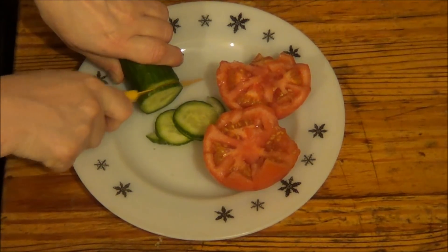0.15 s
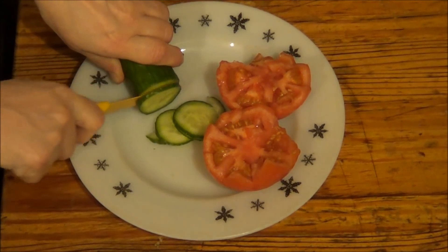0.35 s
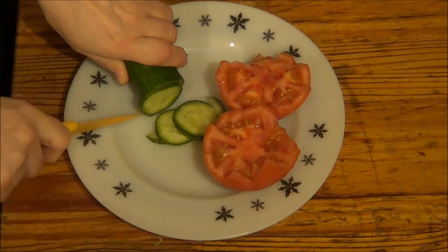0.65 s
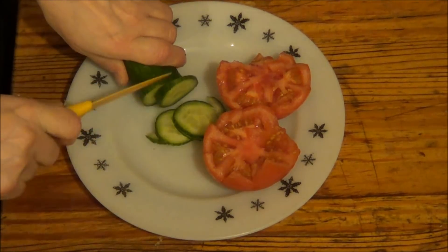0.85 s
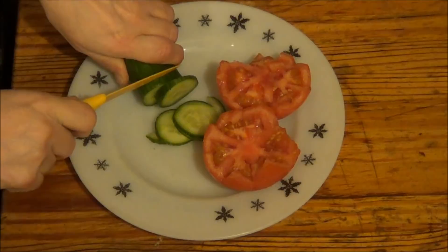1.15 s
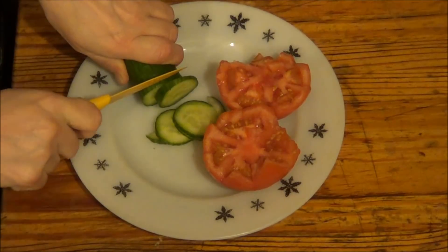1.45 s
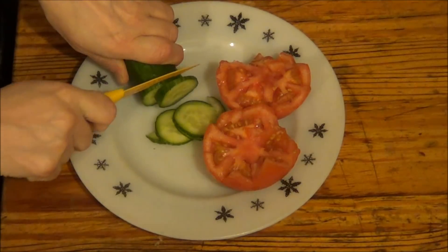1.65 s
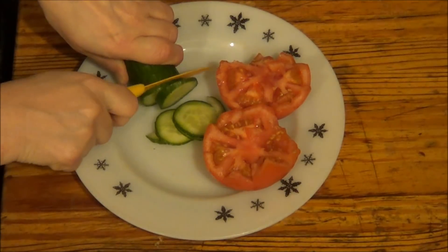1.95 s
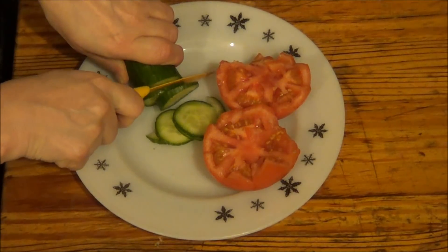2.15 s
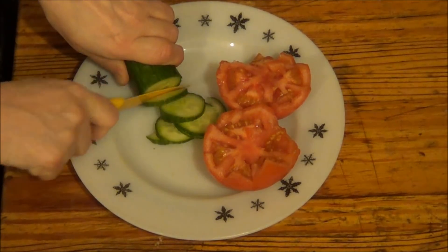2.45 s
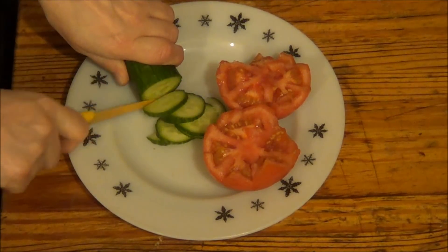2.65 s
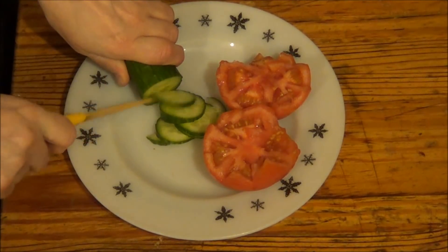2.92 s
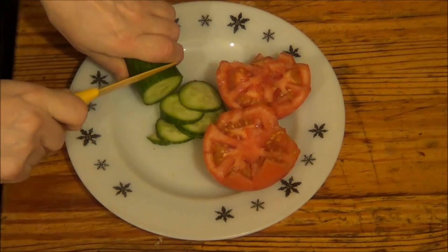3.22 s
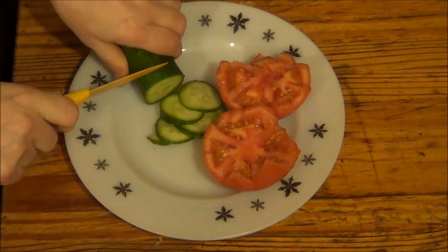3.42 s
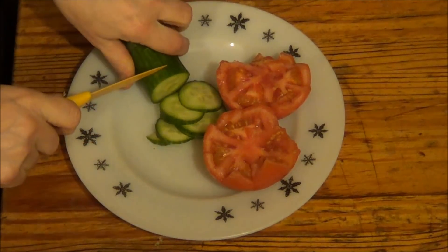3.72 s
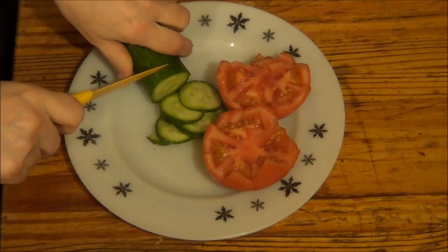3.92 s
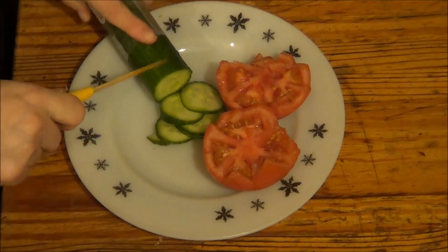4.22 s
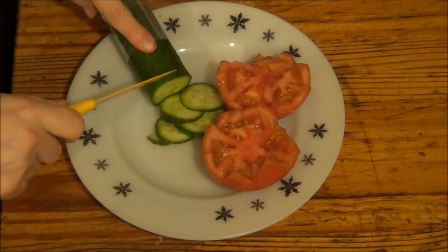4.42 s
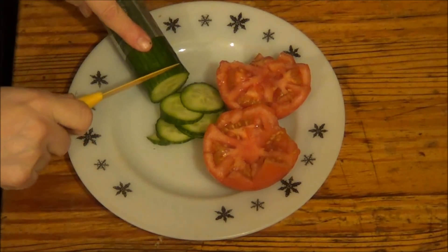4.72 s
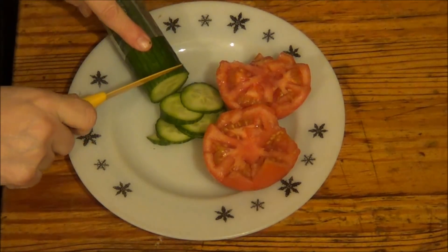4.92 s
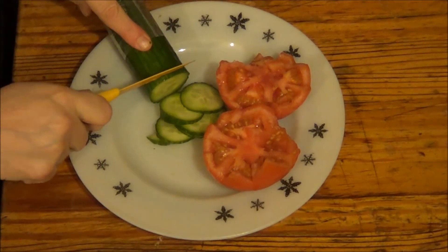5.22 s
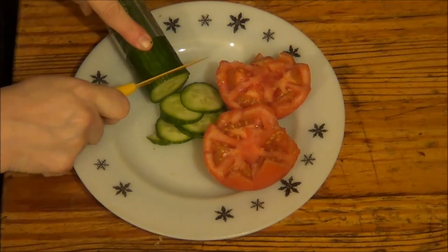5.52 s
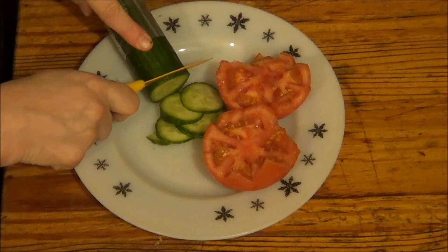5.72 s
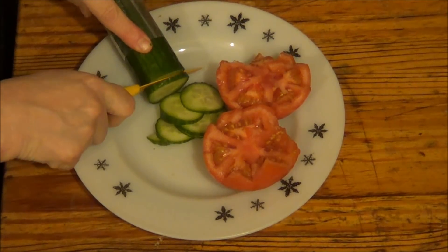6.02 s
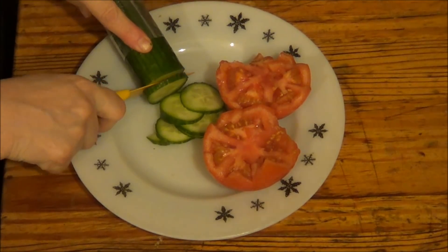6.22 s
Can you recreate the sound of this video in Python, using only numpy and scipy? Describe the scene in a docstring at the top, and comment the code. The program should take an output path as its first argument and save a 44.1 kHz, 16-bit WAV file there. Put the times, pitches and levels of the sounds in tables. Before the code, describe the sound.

Stereo close microphone: crisp, grainy slicing of cucumber, dry knife clicks with short metallic ringing, and gritty ceramic scraping. The busiest burst comes early; later cuts are spaced out, with tiny ticks, a faint squeak, light plate rubs and a dull wooden knock between them. A final crunch and hard strike follow a near lull. The room adds a short dull tail over quiet air and a faint throbbing high whine.

```python
"""A small knife saws through a cucumber, drags over a ceramic plate and ticks against it, heard close up in a kitchen.
Crunch is random snaps coloured to the treble; drags are dense grit driving blade or plate modes.
Ticks are short noise cracks with ringing modes, thuds swelling and dying bands of noise from the wooden table.
A diffuse room tail follows; room air (filtered noise) and a thin throbbing whine lie under it."""
import sys
import numpy as np
from scipy import signal
from scipy.fft import rfft, irfft, next_fast_len
from scipy.io import wavfile

SR = 44100
rng = np.random.default_rng(int(sys.argv[2]) if len(sys.argv) > 2 else 0)


def wrap_up_sound(samples):
    """Save the sound to the file named by the first command line argument, as 16-bit audio."""
    columns = np.atleast_2d(samples).T
    # keep every value between -1 and 1, then stretch to whole-number steps
    tamed = np.clip(columns, -1, 1)
    steps = np.round(tamed * 32767).astype(np.int16)
    wavfile.write(sys.argv[1], SR, steps)


N = 280917


def undb(db):
    """Decibels to amplitude."""
    return 10 ** (np.asarray(db) / 20)


def level(x, db):
    """Scale x to an RMS of db."""
    return x * undb(db) / np.sqrt(np.mean(x ** 2))


def colour(x, table):
    """Filter by (frequency [Hz], gain [dB]) points, joined over log frequency."""
    size = next_fast_len(len(x))
    hz, db = np.transpose(table)
    bin_hz = np.arange(size // 2 + 1) * SR / size
    gain = undb(np.interp(np.log(bin_hz + 1), np.log(hz), db))
    return irfft(rfft(x, size) * gain, size)[:len(x)]


def band(x, lo_hz, hi_hz):
    """Band-pass."""
    return signal.sosfilt(signal.butter(2, [lo_hz, hi_hz], "band", fs=SR, output="sos"), x)


def add(out, at_s, x, peak_db):
    """Lay x into out at at_s with its peak at peak_db."""
    k = int(at_s * SR)
    out[k:k + len(x)] += (x * undb(peak_db) / np.max(np.abs(x)))[:N - k]


def background():
    """Room air, alike in both ears in bass and treble, and a high whine that throbs at 50 Hz."""
    # air common to both ears: (frequency [Hz], density [dB per Hz], relative)
    common_air = [(15, -41), (25, -14), (131, -6), (192, -7), (226, -7.5), (330, -7), (496, -11.5),
                  (553, -10), (1060, -14.5), (2210, -18), (12200, -21.5), (15200, -21.5), (16500, -18)]
    # air of opposite sign left and right: (frequency [Hz], density [dB per Hz], relative)
    wide_air = [(15, -47), (25, -29), (121, -13), (288, -6.5), (584, -6), (831, -6.5), (1010, -8),
                (1150, -8.5), (9330, -23), (16500, -79)]
    # whine level, dips and creeps back up: (time [s], level [dB])
    creep = [(0, -52.5), (.5, -53), (.75, -58.5), (2.23, -54), (2.3, -59), (3.0, -65), (4.2, -59),
             (6.14, -54.5), (6.19, -59.5), (6.37, -54)]
    whine_hz, throb_hz, throb_depth = 15625, 50, 0.55
    s = np.arange(N) / SR
    at, db = np.transpose(creep)
    whine_db = np.interp(s, at, db)
    # air levels where the whine is weakest
    mid = level(colour(rng.standard_normal(N), common_air), -49.5)
    side = level(colour(rng.standard_normal(N), wide_air), -53.5)
    throb = 1 + throb_depth * np.sin(2 * np.pi * throb_hz * s)
    whine = np.sqrt(2) * np.sin(2 * np.pi * whine_hz * s) * throb
    # air follows the whine's level by 0.77 dB per dB
    air_gain = undb(0.77 * (whine_db - whine_db.min()))
    air = (mid + side * np.array([[1], [-1]])) * air_gain
    return air + whine * undb(whine_db)


def ring(modes, damping=0.98):
    """A third of a second of each decaying mode, one row a mode; damping divides the t60."""
    hz, db, t60_s = np.transpose(modes)[:, :, None]
    s = np.arange(SR // 3) / SR
    decay = 1000 ** (-s * damping / np.clip(t60_s, .005, .4))
    return undb(db) * np.sin(2 * np.pi * hz * s) * decay


def blade_modes():
    """Resonances of the hand-held blade as modes: the wider, the shorter."""
    # (frequency [Hz], width [Hz], level [dB] before the width is added)
    resonances = [(900, 480, -1.5), (1985, 11, -2), (2057, 56, 5.5), (2980, 73, -2), (3110, 82, 6.5),
                  (3370, 200, 0), (4440, 27, -5), (4540, 34, 5), (5620, 27, 4), (6100, 40, -6),
                  (6234, 150, 8.5), (8000, 200, -32), (9900, 83, -12), (10280, 61, 4.5), (10500, 120, -26)]
    return [(hz, db + 10 * np.log10(width_hz), np.log(1000) / np.pi / width_hz)
            for hz, width_hz, db in resonances]


def plate_modes():
    """A round plate rings in close pairs: each mode has a weaker, shorter twin."""
    # (frequency [Hz], level [dB], t60 [s] before damping)
    modes = [(560, -17, .2), (630, -19, .2), (1287, -17, .4), (1992, -17, .22), (2078, -16, .26),
             (2720, -15, .08), (2891, -9, .29), (3079, -14, .13), (3250, -15, .1), (3420, -13, .17),
             (3800, -11, .14), (4260, -11, .08), (4380, -9, .09), (4580, -15, .2), (4750, -17, .15),
             (5070, -11, .08), (5308, -5, .09), (5840, -18, .2), (6185, -16, .12), (6444, -8, .11),
             (7040, -18, .13), (7930, -13, .14), (9780, -11, .12), (11785, -14, .13), (13940, -24, .12)]
    return modes + [(hz * 1.02, db - 8, t60_s / 2) for hz, db, t60_s in modes]


def struck(rings, scatter_db):
    """Every spot struck weighs the modes anew."""
    return undb(scatter_db * rng.standard_normal(len(rings))) @ rings


def ticks():
    """A crack under a millisecond and one bounce; the edge chatters on and shakes blade and plate, damped by the hand."""
    # (time [s], sharp crack peak [dB], dull crack peak [dB], blade ring peak [dB], plate ring peak [dB],
    #  share of after-chatter [0-1])
    blows = [(0.0145, -14, -15.5, -14.5, -24, 0.16), (0.2996, -23, -35, -30, -45, 0.3),
             (0.3643, -7.5, -17, -13.5, -45, 0.16), (0.4194, -1.5, -8.5, -8.5, -42, 0.1),
             (0.449, -21, -24, -20, -41, 0.25), (0.497, -12, -22, -26, -45, 0),
             (0.4993, 0.5, -6, -13, -45, 0.17), (0.536, -7, -25, -13, -40, 0.13),
             (0.5463, -8, -13.5, -32, -46, 0.1), (0.559, -11, -22, -36, -35, 0),
             (1.8632, -21, -46, -47, -51, 0.5), (1.9736, -22, -39, -45, -53, 0.27),
             (2.179, -21.5, -45, -47, -53, 0), (2.218, -19, -41, -47, -56, .3),
             (2.2395, -3.5, -6.5, -7.5, -11, 0.26), (2.607, -21, -36, -39, -41, 0.1),
             (2.6594, -27, -30, -47, -45, 0.4), (2.723, -16.5, -27, -30, -38, 0.37),
             (2.7424, -9.5, -23, -25, -39, 0.2), (3.3226, -26, -50, -52, -58, 0.33),
             (3.356, -39, -45, -46, -53, 0.02), (3.3879, -20.5, -21, -34, -46, 0.3),
             (3.4167, -25, -35, -45, -55, 0.24), (3.4544, -28, -46, -50, -50, 0.3),
             (3.4625, -23, -47, -50, -46, 0.15), (3.5605, -24, -50, -53, -59, 0),
             (3.58, -20, -37, -47, -56, 0.1), (3.5914, -24, -45, -54, -57, 0),
             (3.7015, -28, -43.5, -42, -44, 0.3), (3.9923, -27, -43, -43, -46, 0.1),
             (4.2527, -41, -37, -28.5, -46, 0.4), (4.2746, -26, -48, -50, -52, 0.14),
             (4.4863, -26.5, -50, -55, -56, 0.26), (4.495, -31, -50, -55, -56, 0.1),
             (5.7827, -24, -29.5, -41, -53, 0.23), (5.829, -24.5, -40, -50, -55, .1),
             (5.8444, -26, -33, -46, -52, 0), (5.8685, -25, -45, -47, -53, 0),
             (5.9816, -24, -28.5, -38, -44, 0.3), (6.018, -27, -46, -48, -55, 0.4),
             (6.11, -29, -26, -39, -51, 0.2), (6.135, -27, -27, -48, -50, 0),
             (6.1531, -0.5, -10.5, -7, -20, 0.04), (6.1648, -26, -43, -32, -26.5, 0.1)]
    crack_decay_s, chatter_decay_s = 0.00033, 0.0073
    out, s = np.zeros(N), np.arange(SR // 10) / SR
    blade, plate = ring(blade_modes(), damping=1.11), ring(plate_modes(), damping=2.0)
    for at_s, sharp_db, dull_db, blade_db, plate_db, after in blows:
        snap = rng.standard_normal(len(s)) * np.exp(-s / crack_decay_s)
        bounce_s = rng.uniform(0.0021, .003)
        snap = snap + 0.49 * np.roll(snap, int(bounce_s * SR))
        chatter = after * rng.standard_normal(len(s)) * np.exp(-s / chatter_decay_s)
        blow = (s == 0) + 0.34 * chatter
        blade_ring = signal.fftconvolve(blow, struck(blade, 0.79))
        plate_ring = signal.fftconvolve(blow, struck(plate, 2.0))
        add(out, at_s, band(snap + chatter, 7750, 12850), sharp_db)
        add(out, at_s, band(snap + chatter, 4300, 5900), dull_db)
        add(out, at_s, blade_ring, blade_db)
        # a blow through the edge wakes mostly the plate's middle modes
        add(out, at_s, band(plate_ring, 1800, 3700), plate_db)
    return out


def thuds():
    """The table top's modes are too crowded to tell apart: each blow swells for a moment and dies as a rumble."""
    # (time [s], peak [dB], low edge [Hz], high edge [Hz], t60 [s])
    blows = [(0.024, -21.5, 134, 437, 0.26), (0.03, -36, 54.7, 100., 0.17), (0.42, -32, 150., 380, 0.18),
             (0.62, -48, 59.6, 133, 0.075), (0.645, -34.5, 406, 1450, 0.34), (2.045, -30, 110., 263, 0.14),
             (2.244, -25.5, 150., 890, 0.22), (2.259, -42.5, 54.5, 91, 0.19), (2.86, -34, 470, 890, 0.32),
             (3.729, -35.5, 198, 610, 0.6), (4.251, -15, 197, 750, 0.22), (4.255, -26.5, 60., 210, 0.2),
             (6.085, -31, 66, 149, 0.24), (6.154, -27.5, 194, 710, 0.22)]
    out, s = np.zeros(N), np.arange(SR // 3) / SR
    for at_s, peak_db, lo_hz, hi_hz, t60_s in blows:
        swell = (1 - np.exp(-s * lo_hz * 3.0)) * 1000 ** (-s / t60_s)
        rumble = band(rng.standard_normal(len(s)), lo_hz, hi_hz)
        rumble = band(rumble, lo_hz * 0.74, hi_hz * 1.37)
        rumble = band(rumble * swell, lo_hz * 0.79, hi_hz * 1.6)
        add(out, at_s, rumble, peak_db)
    return out


def force(strokes, axis):
    """Gain over time: every stroke swells, holds and dies away; the strongest one rules."""
    swell_db = 20  # change over one rise or fall time
    s, gain_db = np.arange(N) / SR, np.full(N, -120.)
    for row in strokes:
        at_s, rise_s, hold_s, fall_s = row[:4]
        end_s = at_s + hold_s
        k = slice(max(int((at_s - 3 * rise_s) * SR), 0), int((end_s + 3 * fall_s) * SR))
        before = np.maximum(at_s - s[k], 0) / rise_s
        after = np.maximum(s[k] - end_s, 0) / fall_s
        gain_db[k] = np.maximum(gain_db[k], row[axis] - swell_db * (before + after))
    return undb(gain_db)


def grains(rate_hz, spread_db):
    """Random snaps: many small, a few large."""
    hit = rng.random(N) < rate_hz / SR
    return hit * rng.standard_normal(N) * undb(spread_db * rng.exponential(size=N))


def rubbed(modes, gain, grit_db):
    """Dense grit under the edge drives the modes and is heard itself."""
    # direct grit: (frequency [Hz], density [dB per Hz], relative)
    grit_colour = [(180, -56), (300, -68), (689, -6), (2570, -33), (2980, -1), (4020, -2.5), (6410, -3),
                   (14200, -15.5), (16000, -29)]
    grit = level(grains(rate_hz=9000, spread_db=2.5), 0)
    body = ring(modes).sum(axis=0)
    body = body / np.sqrt(np.sum(body ** 2))
    rung = signal.fftconvolve(grit * gain, body)[:N]
    direct = undb(grit_db) * gain * level(colour(grit, grit_colour), 0)
    return rung + direct


def sawing():
    """Cells burst under the edge, while the blade sings where it drags."""
    # knife: (full force [s], rise [s], hold [s], fall [s], flesh crunch [dB], blade on glaze [dB])
    strokes = [(0.19, 0.068, 0.11, .02, -42, -42), (0.355, .08, 0.072, .02, -37, -38),
               (0.45, 0.066, 0.014, 0.065, -32.5, -33.5), (0.512, 0.011, 0.0041, 0.025, -28, -37),
               (0.55, .05, 0.021, .03, -32, -38), (0.63, 0.086, .0, .01, -44, -36.5),
               (0.85, 0.4, 0.36, .9, -47, -73), (1.58, 0.12, 0.0078, .1, -42, -75),
               (1.65, 0.079, .0, .1, -38.5, -66), (1.815, 0.31, 0.047, 0.17, -38.5, -67),
               (2.058, 0.11, .0, 0.058, -28, -60), (2.183, 0.032, 0.058, .01, -41.5, -70),
               (2.217, 0.0046, 0.039, .01, -33.5, -60), (2.245, 0.0053, 0.0058, 0.077, -31.5, -30),
               (2.62, 0.46, 0.088, 0.033, -40, -41.5), (2.755, 0.052, 0.031, 0.12, -46, -45),
               (3.386, 0.094, 0.0088, 0.066, -40, -72), (3.462, .03, .0, .03, -42, -70),
               (3.586, 0.088, 0.025, 0.032, -41.5, -72), (3.7, 0.016, 0.014, 0.049, -39, -70),
               (3.995, 0.11, 0.0081, .09, -46, -67), (4.044, 0.028, .0, 0.024, -39, -70),
               (4.08, .05, 0.17, .05, -50.5, -55), (5.17, 0.067, 0.034, .05, -52, -66),
               (5.256, .05, .0, .05, -41.5, -70), (5.428, 0.12, .0, 0.13, -43, -70),
               (5.596, .05, .0, .1, -41, -70), (5.782, 0.018, 0.0063, 0.11, -37, -55),
               (5.965, .07, .02, 0.11, -38.5, -60), (5.984, 0.027, 0.0012, 0.014, -26, -50),
               (6.086, 0.022, 0.055, 0.016, -32.5, -38.5), (6.16, 0.014, 0.019, 0.037, -35, -37),
               (6.3, 0.26, 0.15, .1, -49.5, -54)]
    # crunch: (frequency [Hz], density [dB per Hz], relative)
    flesh = [(1350, -17.5), (2300, -9), (3340, -16), (4770, -8), (7580, -4), (8710, 0.5), (12000, -5),
             (13600, -11.5), (15100, -6), (16000, -22)]
    # plate mirrors the crunch, shifting as the hand moves: (time [s], lag [ms], strength [dB])
    mirror = [(0, 0.53, -23), (.85, 0.43, -21), (1.1, 0.69, -15), (1.45, 0.55, -4), (1.65, 0.56, -40),
              (6.37, 0.61, -20)]
    s = np.arange(N) / SR
    at, lag_ms, mirror_db = np.transpose(mirror)
    crunch = level(colour(grains(rate_hz=10000, spread_db=1.1), flesh), 0)
    lag_s = np.interp(s, at, lag_ms) / 1000
    mirrored = np.interp(s - lag_s, s, crunch) * undb(np.interp(s, at, mirror_db))
    blade = rubbed(blade_modes(), force(strokes, axis=4 + 1), grit_db=-8.5)
    return (crunch + mirrored) * force(strokes, axis=4) + blade


def scrapes():
    """Grit rings the plate under the blade, its rim under light rubs, and a faint squeak further off."""
    # blade along the plate: (full force [s], rise [s], hold [s], fall [s], level [dB])
    plate_drags = [(0.603, .006, .0, .03, -43), (0.641, 0.0045, 0.015, .02, -25),
                   (0.651, 0.017, 0.0036, 0.028, -18.5), (0.684, 0.021, 0.00032, 0.04, -23),
                   (2.859, 0.0063, 0.019, 0.044, -31)]
    # light rubs nearer the rim: (full force [s], rise [s], hold [s], fall [s], level [dB])
    rim_rubs = [(3.703, 0.0054, .0, 0.14, -51), (3.782, 0.057, .0, 0.027, -41.5),
                (3.993, .005, .03, .02, -48), (4.042, 0.0099, 0.0012, .03, -35.5)]
    # squeak further off: (full force [s], rise [s], hold [s], fall [s], level [dB])
    squeaks = [(3.243, .02, 0.015, 0.023, -45), (3.275, 0.017, 0.018, 0.026, -47.5)]
    # rim modes: (frequency [Hz], level [dB], t60 [s] before limit and damping)
    rim_modes = [(1910, 0.5, 0.046), (2860, -7, 0.47), (3800, 1, 0.11), (4850, -3, .1), (5830, -3, .15),
                 (7040, 0.5, 0.25), (8400, -4, 0.23), (9880, -2, 0.098), (11360, -6, 0.11),
                 (13100, -17, .12)]
    # squeak modes: (frequency [Hz], level [dB], t60 [s] before damping)
    squeak_modes = [(987, -1, 0.12), (3550, -12, 0.044), (5750, -14, 0.04)]
    plate = rubbed(plate_modes(), force(plate_drags, axis=4), grit_db=-0.096)
    rim = rubbed(rim_modes, force(rim_rubs, axis=4), grit_db=-3.5)
    squeak = rubbed(squeak_modes, force(squeaks, axis=4), grit_db=-4.0)
    return plate + rim + squeak


def kitchen(x):
    """Walls answer with a dull tail, different in each ear."""
    tail_db, t60_s, tail_band_hz = -14.5, 0.29, (302, 5370)
    s = np.arange(SR // 2) / SR
    tail = rng.standard_normal((2, len(s))) * 1000 ** (-s / t60_s) * (s > .003)
    tail = signal.lfilter(*signal.butter(1, tail_band_hz, "band", fs=SR), tail)
    tail = tail * undb(tail_db) / np.sqrt(np.sum(tail[0] ** 2))
    return x + signal.fftconvolve(x[None], tail, axes=1)[:, :N]


def scene():
    """Knife, plate and table sound in the room, over the background."""
    return kitchen(ticks() + thuds() + sawing() + scrapes()) + background()


def record(dry):
    """Soft saturation rounds off the loudest peaks; a steep low-pass cuts the top."""
    clip_at, top_hz = .86, 15950
    soft = dry / (1 + np.abs(dry / clip_at) ** 4) ** (1 / 4)
    return signal.sosfilt(signal.ellip(12, .2, 90, top_hz, fs=SR, output="sos"), soft)


dry = scene()
out = record(dry)
wrap_up_sound(out)
```